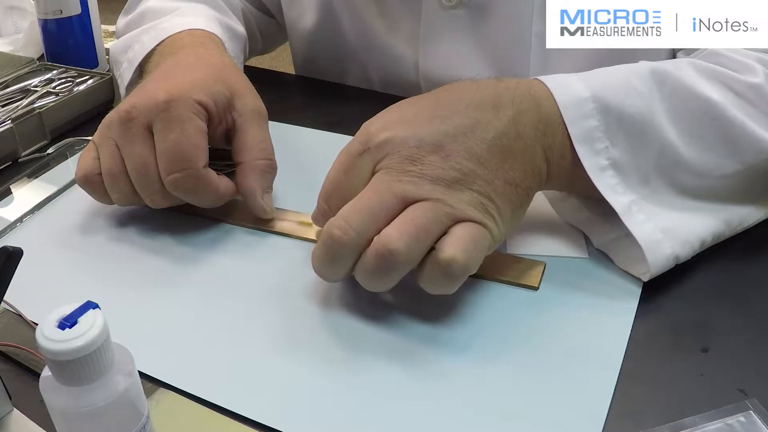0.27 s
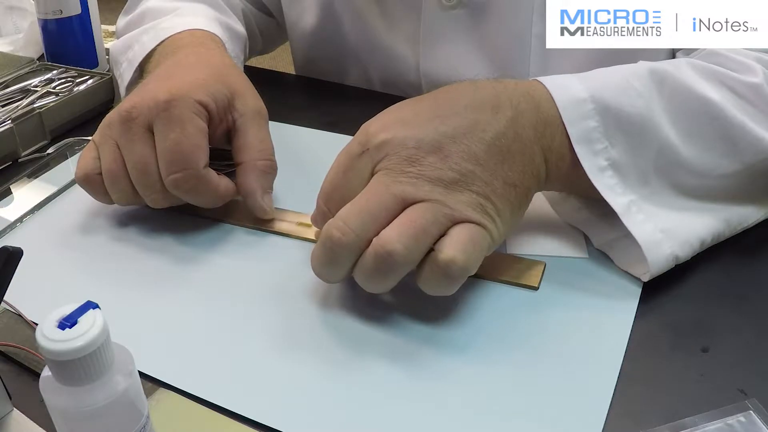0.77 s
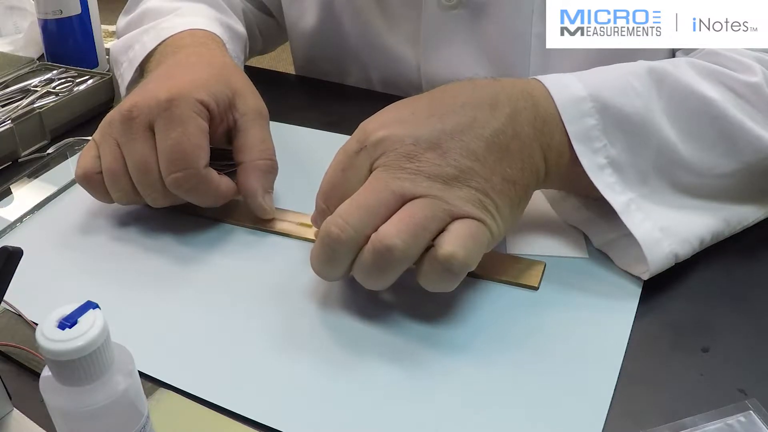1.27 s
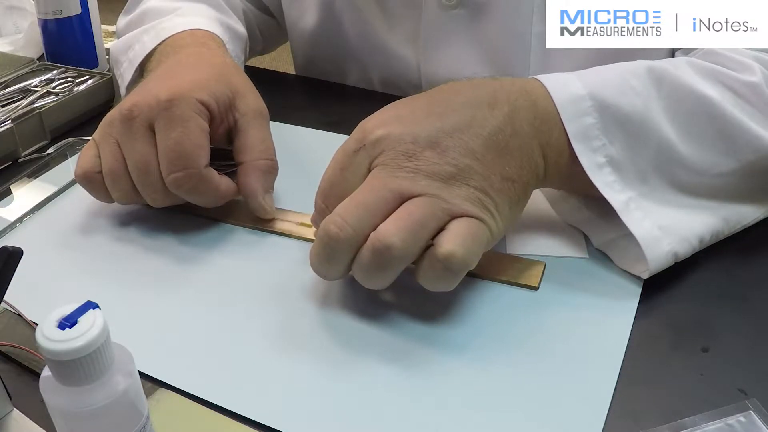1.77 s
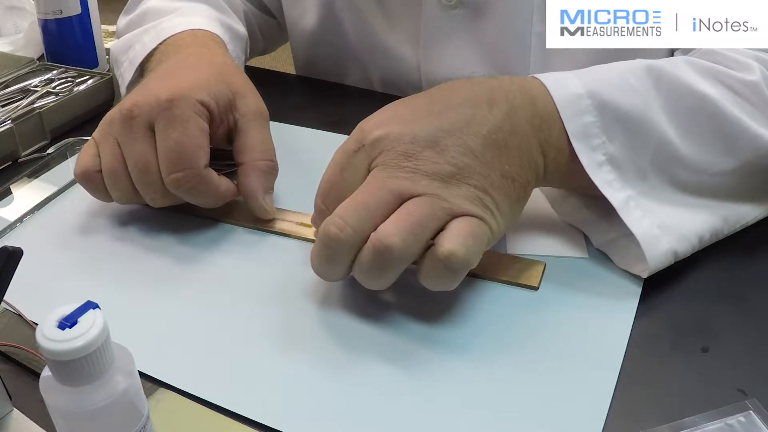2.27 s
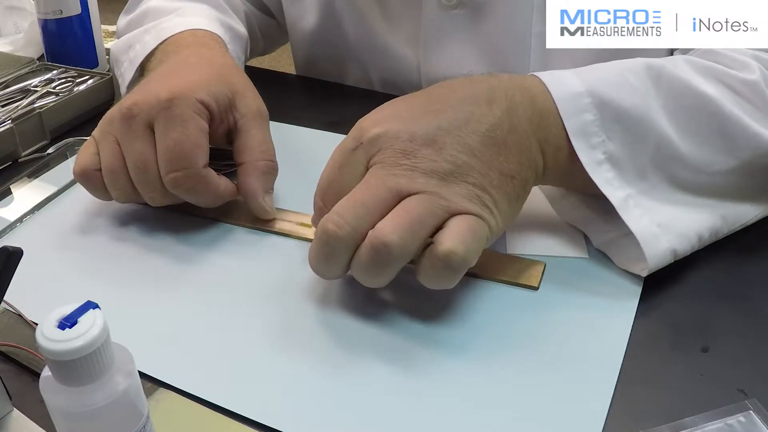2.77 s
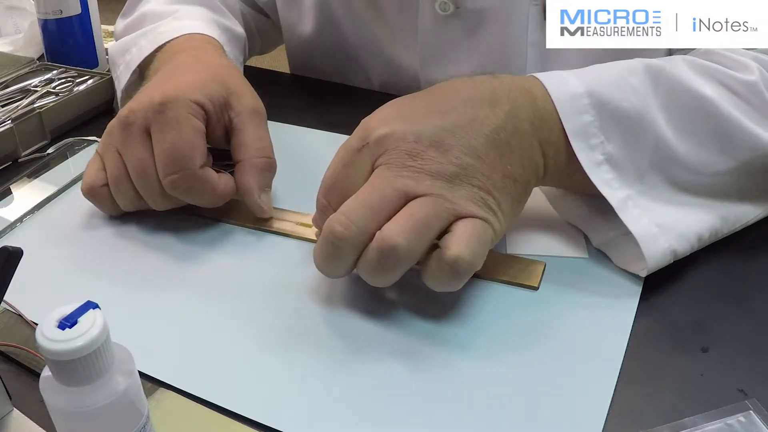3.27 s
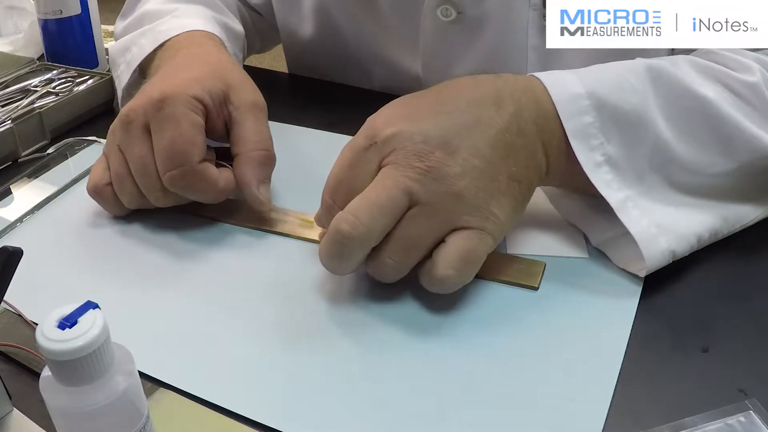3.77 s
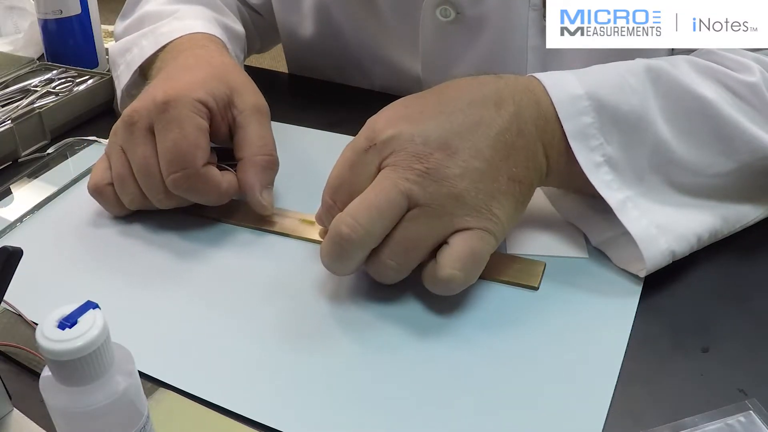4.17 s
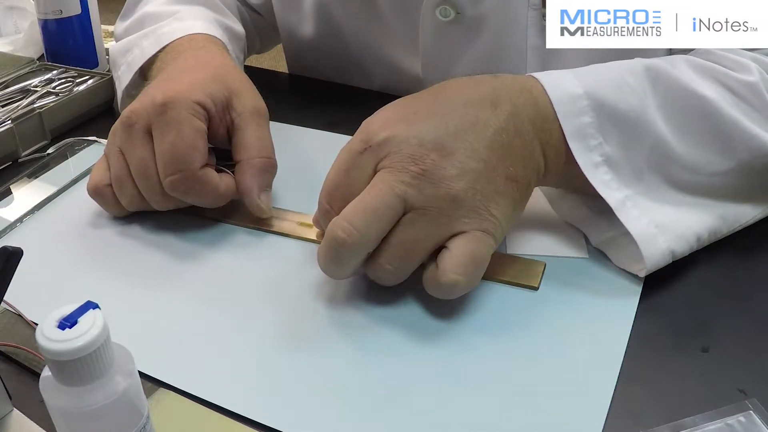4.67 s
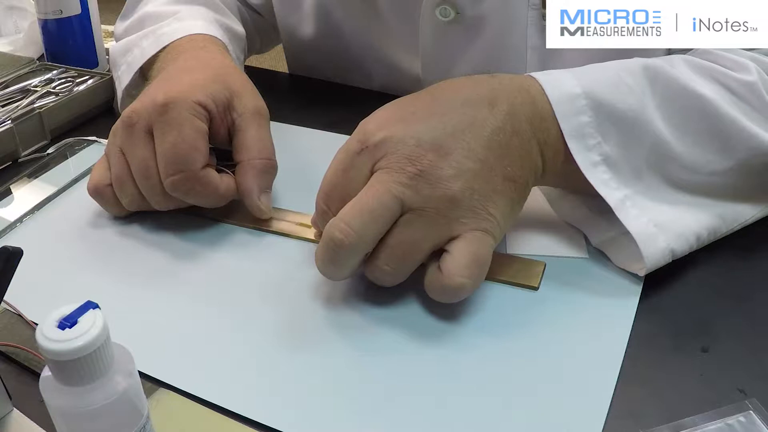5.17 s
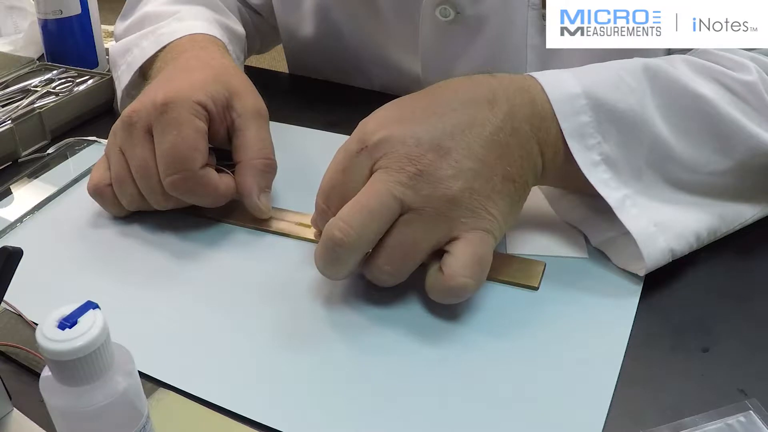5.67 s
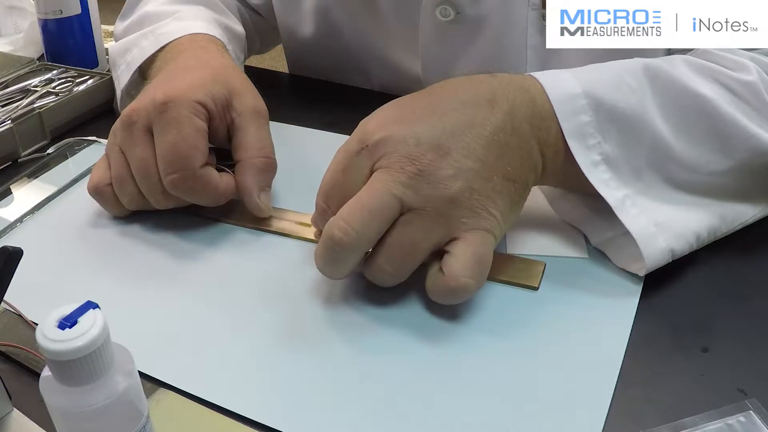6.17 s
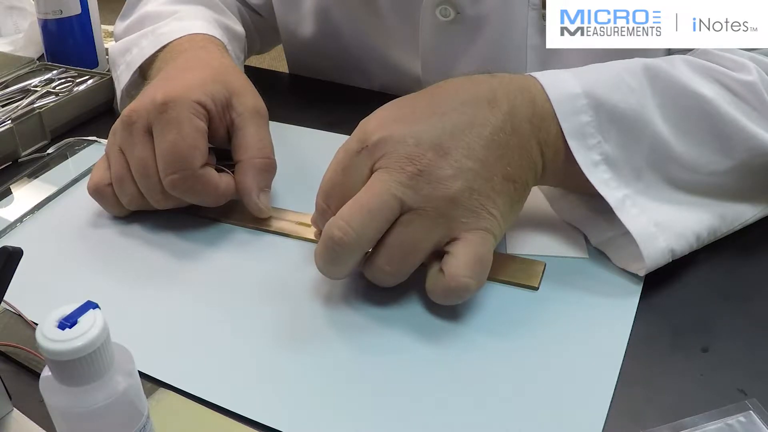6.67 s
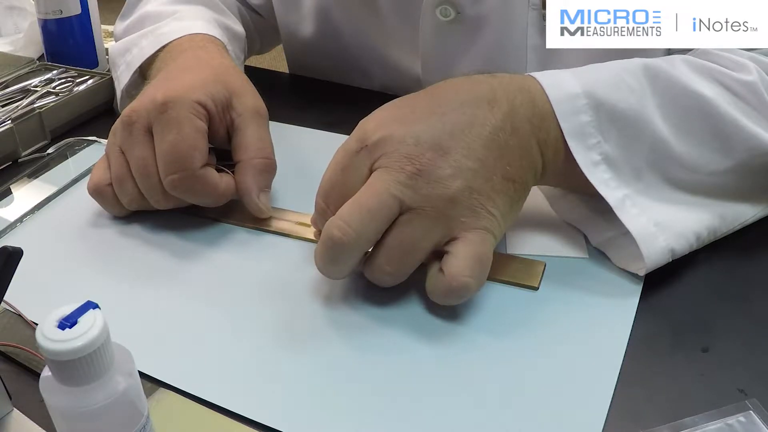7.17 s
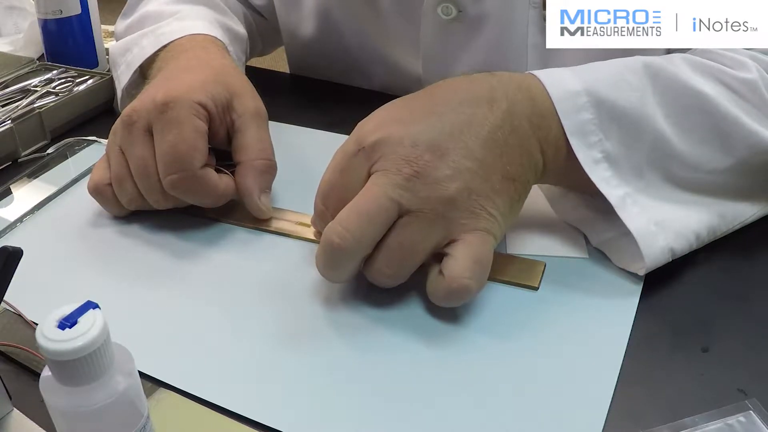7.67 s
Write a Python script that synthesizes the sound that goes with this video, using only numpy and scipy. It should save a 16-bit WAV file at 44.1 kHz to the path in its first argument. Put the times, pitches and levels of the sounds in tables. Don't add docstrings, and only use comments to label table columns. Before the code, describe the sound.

Quiet indoor room hum with thin hiss and a buzzing high whine; a thin tick, then a fuller click, later one barely audible tick.

```python
import sys
import numpy as np
from scipy import signal
from scipy.fft import rfft, irfft, next_fast_len
from scipy.io import wavfile
from scipy.ndimage import uniform_filter1d

SR = 44100
rng = np.random.default_rng(int(sys.argv[2]) if len(sys.argv) > 2 else 0)


def natural_amplitude(level_db):
    exponent = np.asarray(level_db, float) / 20
    return 10 ** exponent


def to_wav(sig):
    pcm = np.clip(np.atleast_2d(sig), -1, 1) * 32767
    pcm = np.round(pcm).astype(np.int16)
    wavfile.write(sys.argv[1], SR, pcm.T)


N = 349578

# (time [s], peak level [dB], mode set [0-2], tearing decay t60 [s])
SNAP_EVENTS = [
    (3.4692, -42, 2, .05),
    (3.4730, -29, 0, .005),
    (3.4734, -22.5, 0, .008),
    (3.4743, -27, 0, .005),
    (3.7356, -18, 1, .011),
    (3.7378, -30, 1, .010),
    (5.3968, -39, 2, .012),
]
# (frequency [Hz], bandwidth [Hz], level [dB])
STRIP_MODES = [
    [(650, 460, -14), (1190, 420, -10), (2920, 680, -10), (5540, 1100, -7), (8050, 770, -9),
     (9150, 600, -4.5), (10600, 570, -1), (13100, 640, 0), (15200, 900, -19)],
    [(600, 380, -6), (1270, 370, -9.5), (2400, 740, -11.5), (4660, 830, -0.5), (5250, 560, 0.5),
     (6860, 600, -8), (7860, 440, -2), (9100, 950, -8), (10000, 700, -6.5), (11700, 700, -8),
     (13100, 740, -12.5), (14900, 800, -14)],
    [(2280, 760, 1), (5500, 1200, 3.5), (7600, 1400, 5.5), (9500, 900, 3), (11100, 1200, -3),
     (13500, 1400, 3), (14900, 900, -2)],
]
# (delay [s], level [dB], smear t60 [s])
REFLECTIONS = [
    (.0027, -18, .003),
    (.0108, -19, .004),
    (.0128, -25, .007),
    (.0225, -31, .012),
]
# (band centre [Hz], t60 [s], level [dB])
ROOM_TAIL = [(1500, .16, -42), (3000, .16, -39), (6000, .13, -37), (12000, .09, -37)]
CEILING_HZ, CEILING_DB = 2850, 11
# (time [s], frequency [Hz], level [dB rms], length [s])
SQUEAK_EVENTS = [
    (.47, 6300, -74, .008),
    (2.03, 9800, -82, .06),
]
# (share of cycle [0-1], frequency [Hz])
READOUT_PITCH = [(0, 11200), (.11, 11000), (.16, 10400), (.235, 10250), (.255, 11650), (.44, 11800),
                 (.475, 12820), (.955, 12840), (.975, 11300), (1, 11200)]
READOUT_HZ = 47.952
# (time [s], offset [Hz])
SUPPLY_SAG = [(0, -41), (1.1, -79.5), (1.3, 80), (2.0, 120.5), (2.2, -61.5), (3.3, -21.5), (3.8, 58),
              (4.5, -42), (5.5, 60.5), (6.5, -19), (7.9, 97.5)]
# (frequency [Hz], level [dB rms])
CASE_RESPONSE = [(10200, -65.5), (11700, -68.5), (12800, -68.5), (13300, -86), (13800, -80)]
MOTOR_HZ = [26.9, 36.3, 58.9, 75.7, 79.4, 119.8, 151.4, 177.0, 239.9, 314.6, 330.1, 385.9, 396.7, 569.6]
MOTOR_DB = [-43, -42.5, -41.5, -45, -49, -51.5, -52.5, -57.5, -60, -61, -53.5, -69.5, -59, -73.5]
FAN_WHISTLE_HZ = [587.5, 599.9, 719.7, 829.0, 837.1, 864.7, 913.1, 947.8, 974.7, 1954, 6161.9, 6257.8]
FAN_WHISTLE_DB = [-71, -71, -70.6, -74, -70, -68.5, -69.5, -76.5, -79, -93, -94, -100]
# (frequency [Hz], level [dB per Hz])
DUCT_RUMBLE = [(8, -83), (16, -61.5), (40, -52), (75, -59.5), (91, -68), (116, -58.5), (140, -66),
               (250, -73), (330, -73), (395, -73), (450, -78.5), (640, -79.5), (840, -83.5), (1100, -96)]
# (time [s], level [dB])
RUMBLE_LEVEL = [(0, -0.5), (1, -.5), (2.2, 1), (3.2, -0.5), (4.2, 0), (5.2, 0), (6.2, -0.5), (7, 0), (7.93, 2)]
SWING_SHARES = (1, 0.3, 0.079)
# (frequency [Hz], level [dB per Hz])
AIR_HISS = [(300, -110), (1000, -99), (1500, -103), (2500, -103), (4300, -104.5), (5200, -107),
            (6500, -109), (8500, -113), (12000, -113), (15500, -117)]
# (share of frames below [0-1], frequency [Hz])
QUIET_EDGE = [(0, 13500), (.08, 13800), (.15, 14500), (.35, 15100), (.7, 15200), (1, 15550)]


def curve(points, at):
    return np.interp(at, *np.transpose(points)[:2])


def drift(rate):
    step = 40
    r = np.exp(-2 * np.pi * rate * step / SR)
    white = rng.standard_normal(N // step + 4002)
    slow = signal.lfilter([1], [1, -2 * r, r * r], white)[4000:]
    slow = (slow - slow.mean()) / slow.std()
    return np.interp(np.arange(N) / step, np.arange(len(slow)), slow)


def coloured(spectrum, slope_db):
    size = next_fast_len(N)
    octave = np.log2(np.maximum(np.arange(size // 2 + 1) * SR / size, 1))
    points = [(np.log2(hz), db) for hz, db in spectrum]
    level_db = curve(points, octave) + slope_db * np.maximum(octave - points[-1][0], 0)
    white = rfft(rng.standard_normal(size))
    return irfft(white * natural_amplitude(level_db) * np.sqrt(SR / 2), size)[:N]


def resonance(x, hz, width_hz):
    r = np.exp(-np.pi * width_hz / SR)
    poles = [1, -2 * r * np.cos(2 * np.pi * hz / SR), r * r]
    return signal.lfilter([(1 - r * r) / 2, 0, (r * r - 1) / 2], poles, x)


def snaps():
    out, length = np.zeros(N), 2000
    t = np.arange(length) / SR
    for s, peak_db, mode_set, t60 in SNAP_EVENTS:
        tearing = 0.27 * rng.standard_normal(length) * natural_amplitude(-60 * t / t60)
        burst = tearing + (t == 0)
        rung = np.zeros(length)
        for k, (hz, width, level_db) in enumerate(STRIP_MODES[round(mode_set)]):
            mode = resonance(burst, hz, width)
            mode = mode / np.linalg.norm(mode)
            rung += (-1) ** k * natural_amplitude(level_db) * np.sqrt(width) * mode
        at = round(s * SR)
        out[at:at + length] += natural_amplitude(peak_db) * rung / rung[np.abs(rung).argmax()]
    return out


def room(x):
    t = np.arange(SR // 3) / SR
    response = np.zeros(len(t))
    for lag, db, smear in REFLECTIONS:
        envelope = natural_amplitude(db - 60 * np.abs(t - lag) / smear) * (t > lag)
        response += 0.4 * envelope * rng.standard_normal(len(t))
    ceiling = response * (np.abs(t - .0125) < .003)
    response += natural_amplitude(CEILING_DB) * resonance(ceiling, CEILING_HZ, 500)
    for hz, t60, db in ROOM_TAIL:
        band = signal.butter(2, [hz / np.sqrt(2), hz * np.sqrt(2)], "band", fs=SR, output="sos")
        decay = natural_amplitude(db - 60 * t / t60) * np.minimum(t / .012, 1)
        response += signal.sosfilt(band, rng.standard_normal(len(t))) * decay
    return x + signal.fftconvolve(x, response)[:N]


def squeaks():
    t, out = np.arange(N) / SR, np.zeros(N)
    for s, hz, db, length in SQUEAK_EVENTS:
        swell = np.exp(-(2 * (t - s) / length) ** 2)
        out += np.sqrt(2) * natural_amplitude(db) * swell * np.sin(2 * np.pi * hz * t)
    return out


def supply_whine(busy_hz, jitter_hz, slow_hz):
    cycles = np.arange(N) / SR * READOUT_HZ
    share = cycles % 1
    turn = (cycles + .4).astype(int)
    chance, size, trim = rng.random((3, turn[-1] + 1))
    odds = np.array([.12, .25, .1, .85])[np.arange(len(chance)) % 4]
    works = chance < odds
    busy = (works * (0.38 + 0.8 * size))[turn]
    sag = (works * (trim < .35))[turn] * (share > .46)
    later = np.roll(sag, round(.37 * SR / READOUT_HZ))
    sag = np.maximum(sag * (share < .6), later * (share > .6))
    hz = curve(READOUT_PITCH, share) + busy_hz * busy * (1 - sag) - 380 * sag
    hz = uniform_filter1d(hz, size=40) + curve(SUPPLY_SAG, cycles / READOUT_HZ)
    hz += slow_hz * drift(8) + jitter_hz * drift(160)
    return np.sqrt(2) * natural_amplitude(curve(CASE_RESPONSE, hz)) * np.sin(2 * np.pi * np.cumsum(hz) / SR)


def motors(wobble_db, wander):
    t, out = np.arange(N) / SR, np.zeros(N)
    for hz, db in zip(MOTOR_HZ + FAN_WHISTLE_HZ, MOTOR_DB + FAN_WHISTLE_DB):
        slow = drift(0.43)
        phase = 2 * np.pi * (hz * t + rng.random()) + wander * (1 + hz / 900) * slow
        out += np.sqrt(2) * natural_amplitude(db + wobble_db * slow[::-1]) * np.sin(phase)
    return out


def ventilation(tones):
    rumble_db = curve(RUMBLE_LEVEL, np.arange(N) / SR)
    swing_db = rumble_db - rumble_db.mean()
    air = coloured(DUCT_RUMBLE, slope_db=-18.0) + tones
    deep = signal.sosfiltfilt(signal.butter(2, 92, fs=SR, output="sos"), air)
    low = signal.sosfiltfilt(signal.butter(2, 200, fs=SR, output="sos"), air)
    ranges = deep, low - deep, air - low
    return sum(part * natural_amplitude(share * swing_db) for part, share in zip(ranges, SWING_SHARES))


def hiss():
    return coloured(AIR_HISS, slope_db=-51.0)


def scene():
    snapping = room(snaps())
    whine = supply_whine(busy_hz=610, jitter_hz=23.2, slow_hz=39.9)
    air = ventilation(motors(wobble_db=2.0, wander=0.43))
    return (snapping + squeaks() + whine + air + hiss())[None]


def band_limit(x):
    return signal.sosfilt(signal.butter(12, 16470, fs=SR, output="sos"), x)


def record(dry):
    settings = dict(nperseg=2048, noverlap=1024, window="cosine")
    mirrored = np.r_[dry[0], dry[0, :-2049:-1]]
    hz, s, frames = signal.stft(mirrored, SR, **settings)
    wander = drift(9.8)[np.minimum(s * SR, N - 1).astype(int)]
    rank = np.argsort(np.argsort(wander)) / len(s)
    below_edge = hz[:, None] < curve(QUIET_EDGE, rank)
    below_limit = hz[:, None] < 16400
    kept = signal.istft(frames * below_edge, SR, **settings)[1][:N]
    full = signal.istft(frames * below_limit, SR, **settings)[1][:N]
    top = full - kept
    power = uniform_filter1d(top ** 2, size=256)
    transient = uniform_filter1d(1. * (power > 12 * power.mean()), size=128)
    ease_out = np.minimum(.3 + np.arange(N)[::-1] / (.03 * SR), 1)
    mix = ease_out * (kept + transient * top)
    return band_limit(mix[None])


dry = scene()
out = record(dry)
to_wav(out)
```